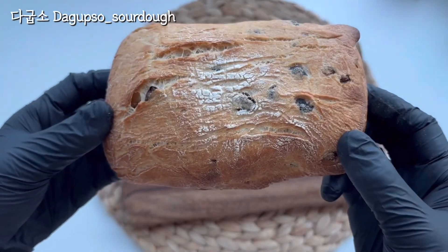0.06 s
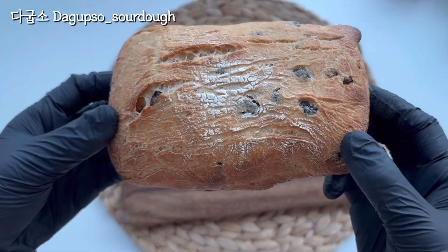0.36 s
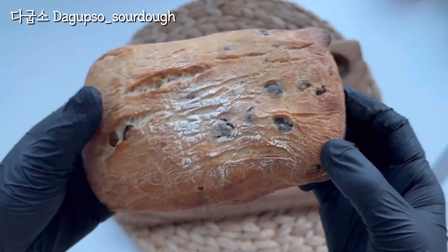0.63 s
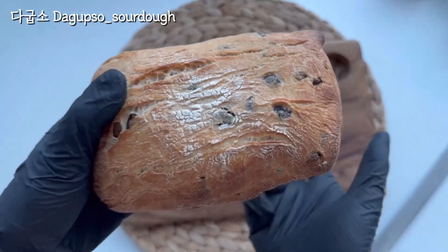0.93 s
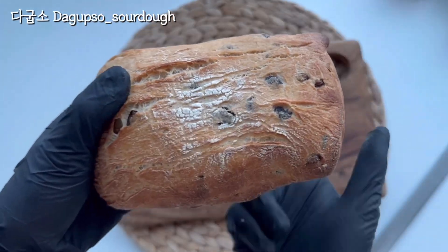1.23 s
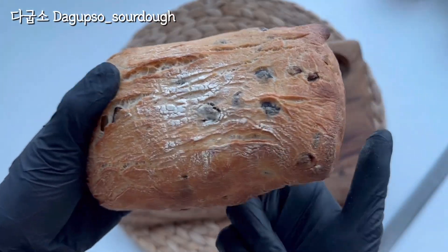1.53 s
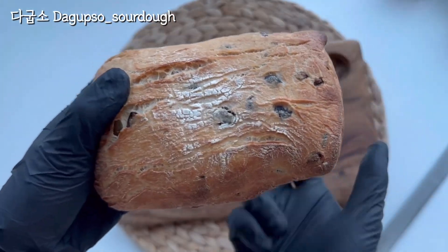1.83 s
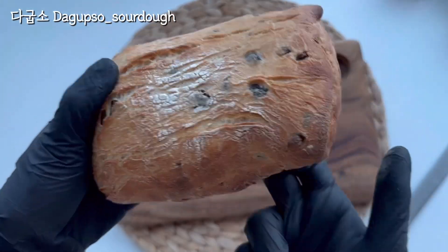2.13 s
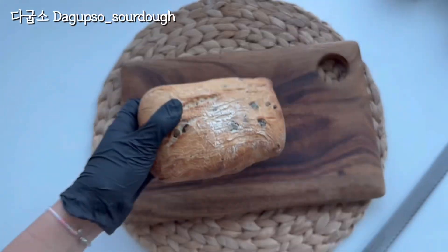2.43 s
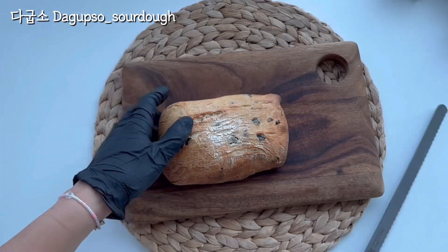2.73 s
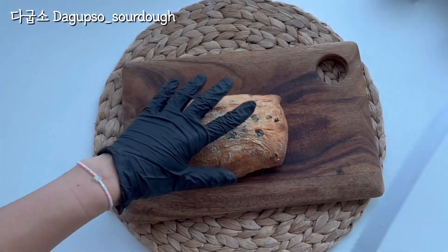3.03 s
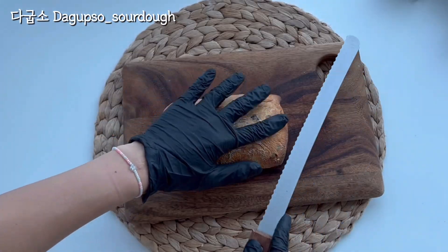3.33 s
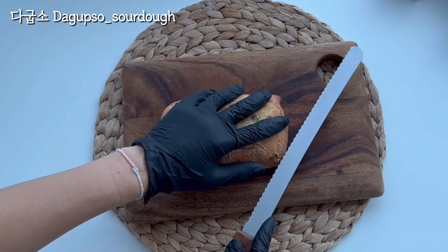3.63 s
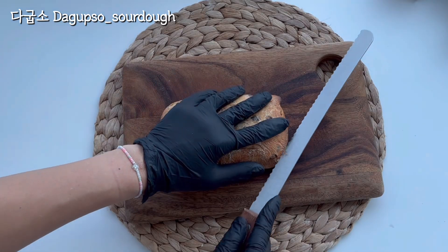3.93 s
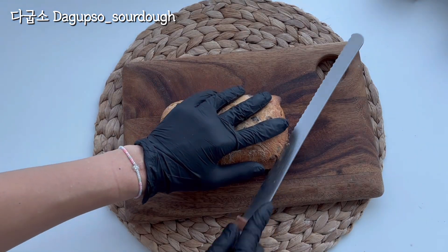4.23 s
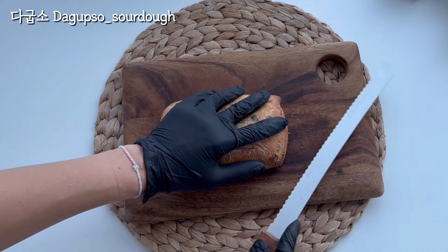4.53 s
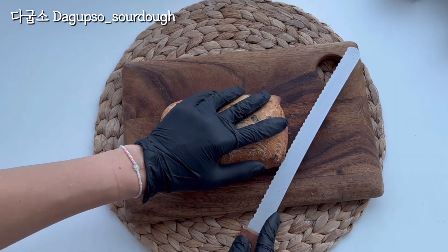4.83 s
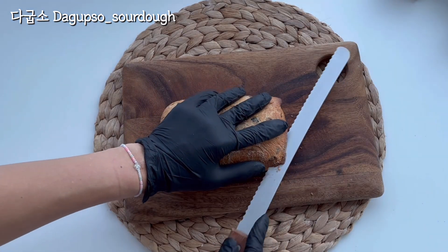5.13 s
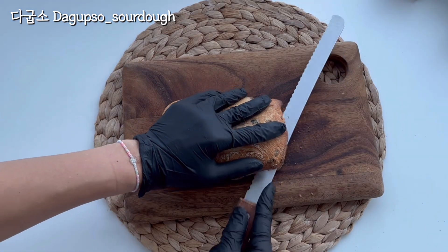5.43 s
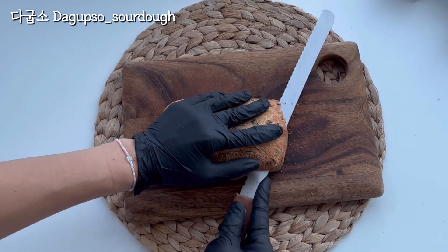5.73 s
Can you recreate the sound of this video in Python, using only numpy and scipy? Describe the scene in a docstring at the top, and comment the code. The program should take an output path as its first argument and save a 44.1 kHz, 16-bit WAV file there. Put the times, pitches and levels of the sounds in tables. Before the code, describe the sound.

At the start, gloved hands turn a crusty loaf with soft, low bumps, a faint rubbery rustle and a tiny creak of crust. From about 1.0 to 2.1 seconds, knuckles knock on it five times, each knock hollow and woody with a dry tick. At 2.5 seconds the loaf thuds onto a wooden board, then rocks and slides with a short rasp until 2.9. Faint glove brushes follow. From about 3.8 to 4.5 seconds a serrated knife saws into the crust in short, crunchy strokes, with flakes snapping sharply. After a brief pause with one small crack, the sawing resumes at 4.9 and continues to about 6 seconds, crackling and rasping while the board and table thump dully underneath. Everything is close and slightly to the left, heard in stereo in a small room with a steady, low ventilation hum.

```python
"""A serrated knife scores and saws a crusty loaf: each catch of the teeth fractures the brittle crust,
flakes crack off, and board and table are forced into vibration. Before the cut, gloved hands turn the
loaf, knock on it five times, set it on a wooden board and slide it into place; the blows excite bending
waves and damped modes, and friction rustles and rasps. A stereo microphone close above hears it all
in a small room with a steady ventilation hum."""
import sys
import numpy as np
from scipy import signal
from scipy.fft import rfft, irfft, next_fast_len
from scipy.io import wavfile
from scipy.ndimage import uniform_filter1d

SR = 44100
rng = np.random.default_rng(int(sys.argv[2]) if len(sys.argv) > 2 else 0)


def generate_wav(sig):
    """Save sig (samples, or channels by samples) to the path in sys.argv[1] as 16-bit PCM at SR."""
    pcm = np.round(np.clip(np.atleast_2d(sig).T, -1, 1) * 32767).astype(np.int16)
    wavfile.write(sys.argv[1], SR, pcm)


N = 263718
TIME = np.arange(N) / SR

# Levels in the tables are relative; each source applies its own gains and filters.
# Strokes of the knife, and pushes of the loaf over the board. Each row: start, fastest moment and end
# in seconds, then levels of crackle, rasp, board and table in dB.
KNIFE_STROKES = [(3.86, 3.95, 3.99, -44.5, -47, -45.5, -41.5), (4.015, 4.07, 4.16, -40, -44, -36, -48),
                 (4.24, 4.3, 4.37, -42.5, -51.5, -44.5, -35), (4.405, 4.41, 4.46, -59, -54, -48.5, -48.5),
                 (4.935, 4.978, 5.07, -41, -45.5, -42, -43.5), (5.11, 5.162, 5.225, -38.5, -43, -44, -44),
                 (5.285, 5.338, 5.43, -37.5, -37, -43, -38), (5.455, 5.53, 5.63, -41.5, -43, -39, -43),
                 (5.665, 5.73, 5.85, -39.5, -39, -39, -34.5),
                 (5.845, 5.895, 5.95, -40, -38.5, -37.5, -31.5)]
LOAF_PUSHES = [(2.63, 2.642, 2.7, -49, -38.5, -54, -66), (2.67, 2.738, 2.848, -33.5, -45.5, -57, -59),
               (2.785, 2.795, 2.84, -63, -36.5, -44, -39.5), (2.84, 2.856, 2.923, -35, -44.5, -45, -40.5)]
# How crackle, rasp, board and table follow a movement. Each row: rise in dB, fall in dB, lag in seconds.
STROKE_ENVELOPES = [(5.3, 25, 0.0014), (5.2, 25.6, 0.0082), (5.9, 11.6, 0.012), (6.6, 16.4, 0.0019)]
PUSH_ENVELOPES = [(13.5, 58, 0.0044), (6, 15.5, 0.014), (5, 10, 0), (-2, 10, 0.0047)]
# The blade dragging in the cut. Each row: start and end in seconds, crackle and rasp levels in dB.
BLADE_DRAGS = [(4.1, 4.398, -56.5, -59), (5.074, 6.1, -55, -55.5)]
# Large flakes breaking. Each row: time in seconds, levels of bright splinter and lower crack in dB.
FLAKE_SNAPS = [(2.631, -31, -34.5), (3.501, -46.5, -53.5), (3.819, -44, -49), (3.9415, -40, -49),
               (4.0094, -28, -38), (4.0323, -23.5, -47), (4.0345, -29, -46), (4.059, -34, -33),
               (4.0843, -39, -33), (4.2464, -36, -58), (4.2687, -24, -50), (4.3154, -26.5, -52),
               (4.397, -42, -62), (4.4075, -39, -45.5), (4.7119, -38, -45.5), (4.8974, -36.5, -47),
               (4.9208, -27.5, -34), (4.9381, -26, -50), (4.9584, -28, -48), (4.979, -26, -42),
               (4.984, -23, -35.5), (5.0886, -44, -53), (5.104, -34, -58), (5.12, -28, -40),
               (5.154, -30, -36), (5.1761, -15.5, -34), (5.1785, -39, -37), (5.266, -29.5, -37),
               (5.2895, -21.5, -39), (5.316, -32, -37), (5.3225, -32, -30), (5.3436, -29, -25),
               (5.42, -37.5, -52), (5.4408, -38, -39), (5.4575, -29, -34.5), (5.528, -27.5, -47),
               (5.544, -38, -32.5), (5.648, -36, -42), (5.6553, -41, -43), (5.6768, -31, -34),
               (5.724, -25, -41), (5.739, -33, -36), (5.894, -39, -36)]
# Snags of the blade. Each row: time in seconds, then the level of each of the three low modes in dB.
BLADE_SNAGS = [(3.873, -49, -34.5, -61), (4.052, -36.5, -40, -28.5), (4.134, -52, -38, -43),
               (4.3, -34.5, -48, -36.5), (4.711, -40.5, -38, -45), (4.99, -50, -36, -47),
               (5.172, -56, -32.5, -46), (5.365, -53, -50, -37.5), (5.7, -22.5, -41, -43),
               (5.901, -27.5, -32, -36)]
# Low modes of table and board. Each row: frequency in Hz, 60 dB decay time in seconds.
LOW_MODES = [(70.5, 0.57), (144, 0.52), (210, 0.41)]
# Knuckle blows. Each row: time in seconds, levels of note, tick and clack in dB, starting pitch in Hz,
# level of the glove's rub in dB, treble gain of the tick in dB.
KNUCKLE_BLOWS = [(1.0357, -18, -23, -19.5, 890, -66, 0), (1.2774, -18, -25.5, -29, 890, -66, 4.5),
                 (1.5004, -17.5, -23.5, -22.5, 914, -64, 0), (1.8862, -17, -22, -16, 883, -63.5, 2),
                 (2.0924, -17.5, -23, -19.5, 895, -61, 5.5)]
# The loaf landing and rocking. Each row: time in seconds, levels of the blow and the loaf's note in dB.
LANDING_BLOWS = [(2.548, -17.5, -20), (2.553, -30.5, -42), (2.786, -30.5, -37), (2.838, -30, -27.5)]
# Soft bumps as fingers grip and the loaf rocks. Each row: start in seconds, level in dB, pitch in Hz.
SOFT_BUMPS = [(.016, -16, 78), (.032, -17, 83.2), (0.064, -21, 88), (0.157, -18.5, 97), (.263, -26, 60.3),
              (1.015, -28.5, 62), (2.58, -27.5, 55), (2.785, -28, 52), (2.869, -25, 48), (4.304, -30, 58.3),
              (4.973, -30, 51.7), (5.148, -28.5, 60.6), (5.368, -25.5, 52.2), (5.59, -23.5, 53.3)]
# Glove touches. Each row: time of most pressure in seconds, level in dB, length in seconds.
GLOVE_BRUSHES = [(0.502, -61, 0.031), (0.543, -60, 0.044), (0.703, -48, 0.17), (0.925, -66.5, 0.6),
                 (2.243, -74, 1), (2.532, -64, 0.018), (2.596, -60, 0.1), (3.06, -58.5, 0.13),
                 (3.173, -65, 0.26), (3.425, -67, 0.28), (3.553, -77, 0.49), (3.72, -65.5, 0.093),
                 (4.737, -66, 0.057), (4.843, -74, 0.15)]
# Creaks of the crust under a finger. Each row: time in seconds, level in dB.
CRUST_CREAKS = [(0.848, -31), (1.806, -37), (1.815, -41), (1.864, -29)]

# Modes of the struck loaf and board. Each row: frequency in Hz, level in dB, 60 dB decay time in seconds.
LOAF_MODES = [(92, -21, 0.35), (141, -17, 0.3), (470, -29, 0.3), (591, -20, 0.13), (693, -26, 0.08),
              (1260, -25, 0.02)]
BOARD_MODES = [(140.3, 5.5, 0.12), (286, -1, 0.083), (347.5, -5, 0.2), (448, 1, 0.15), (603, 1, 0.17),
               (829, 10.5, 0.08), (1050, -1.5, 0.078), (1280, -26, 0.2), (1696, -3, 0.076),
               (1884, -3, 0.08), (2130, -14, 0.08), (2550, -17, 0.052)]
# Resonances of the driven bodies. Each row: centre frequency in Hz, bandwidth in Hz, peak gain in dB.
BOARD_RESONANCES = [(144.3, 15.4, 6.5), (170, 53, -9.5), (211.2, 7.5, 5), (270, 38, -12.5), (352, 32, -10),
                    (457, 17, -10.5)]  # board and loaf pressed on the mat
TABLE_RESONANCES = [(46.3, 16, -6.5), (71.25, 5.7, 17), (99.5, 5.3, -15)]
RASP_RESONANCES = [(600, 30, -3), (828, 30, -4), (1568, 24, -6), (1745, 30, -3), (1925, 34, -4),
                   (2090, 30, -6), (2960, 60, -8), (4190, 70, -8)]
CLACK_RESONANCES = [(850, 450, 2.5), (1550, 550, 4.5), (2550, 600, 6)]
CREAK_RESONANCES = [(3620, 840, 6.5), (6170, 700, -3)]
HELD_LOAF_RESONANCES = [(67.4, 13.5, 12.5), (105.4, 176, -3.5)]
# Spectra of the fractures, contacts and hum. Each row: frequency in Hz, spectral density level in dB.
CUT_RASP_SPECTRUM = [(200, -10), (350, -10), (480, -6.5), (650, -2), (1100, -5.5), (1800, -3.5),
                     (2500, -12), (3300, -8), (4500, -14.5), (7000, -24)]
CUT_CRACKLE_SPECTRUM = [(800, -2.5), (2350, 0), (4100, -2.5), (4710, -4.5), (5730, -4.5), (6630, -0.5),
                        (7930, -5.5), (8650, -0.5), (9600, 3), (12000, -9), (14700, -1.5), (16000, -14)]
FLAKE_SPECTRUM = [(800, -13.5), (3000, -9), (7500, -3), (9600, -1), (12000, 2), (15000, 3), (16000, -7)]
TICK_SPECTRUM = [(400, -12), (900, -3), (1600, 4.5), (2800, -6), (3800, -18), (7000, -14.5), (10000, -10),
                 (15000, -14), (18000, -20)]
THUD_SPECTRUM = [(80, -13), (250, -36), (450, -15), (850, -1.5), (1150, -5), (1800, -13), (2400, -23.5),
                 (4200, -25.5), (7000, -34.5), (16000, -43)]
SLIDE_RASP_SPECTRUM = [(200, -24), (350, -3.5), (600, -7), (950, -1), (1600, -2), (2200, -6.5), (3000, -14),
                       (4500, -20), (7000, -35)]
SLIDE_CRACKLE_SPECTRUM = [(1200, -3), (2500, 5), (3600, 1.5), (4700, 1.5), (6000, -3.5), (7400, -2),
                          (9000, -4.5), (11500, -13), (15000, -11), (16000, -28)]
GLOVE_SPECTRUM = [(1290, -19), (2200, -3), (3330, -0.5), (4310, -5), (5910, -2.5), (8240, -5.5), (9500, -2),
                  (14200, -10), (16000, -9.5)]
HUM_SPECTRUM = [(12, -47.5), (20, 0.5), (81, 8), (193, -6.5), (277, -3), (357, -6), (434, -7), (499, -13),
                (574, -7.5), (780, -8.5), (1030, -6.5), (3740, -39), (8180, -55), (9400, -53), (16000, -64)]

# Reflections from the walls. Each row: delay in seconds, signed gain.
WALL_ECHOES = [(0.0165, -0.17), (0.0229, 0.12), (0.0311, -0.18), (0.0394, -0.135), (0.0424, 0.25),
               (0.0505, -0.2), (0.0733, -0.125), (0.0765, 0.125), (0.0964, 0.08), (0.119, 0.115)]
# Reverberation of the room. Each row: frequency in Hz, 60 dB decay time in seconds, level in dB.
ROOM_DECAY = [(110, 0.77, 0.5), (230, 0.48, -4), (450, 0.37, -0.5), (1500, 0.34, 5), (14400, 0.33, -2.5)]
# Likeness of scattered sound at the two microphones. Each row: frequency in Hz, correlation from -1 to 1.
DIFFUSE_COHERENCE = [(60, 1), (130, 0.89), (290, 0.67), (640, -0.12), (3000, 0.28), (8000, -0.41),
                     (13000, 0.93)]
# Stereo balance of the handling. Each row: frequency in Hz, left minus right level in dB.
LEVEL_DIFFERENCE = [(85, 2), (350, 4), (700, 5.5), (1400, 1.5), (2800, 0.5), (5600, 3.5), (10000, 1),
                    (14000, -0.5)]

ONSET_S = 0.035  # time for a movement to take hold


def sawing():
    """Stick-slip friction: the teeth catch in the crust and drag on even as the blade turns round."""
    crackle, rasp, board, table = movement(KNIFE_STROKES, STROKE_ENVELOPES)
    drag = 0
    for start, end, crackle_db, rasp_db in BLADE_DRAGS:
        contact = np.clip(np.minimum(TIME - start, end - TIME) / ONSET_S, 0, 1)
        drag = drag + from_db([[crackle_db], [rasp_db]]) * contact
    crackle, rasp = np.hypot([crackle, rasp], drag)
    catches = catch_train(per_s=145, jitter=0.35, uneven_db=3.4)
    return scrape([crackle, rasp, board, table], CUT_RASP_SPECTRUM, CUT_CRACKLE_SPECTRUM, catches,
                  grains_per_s=3000, burst_s=0.01, steady=0.55, scatter_db=5.5)


def scrape(gains, rasp_spectrum, crackle_spectrum, catches, grains_per_s, burst_s, steady, scatter_db):
    """Forced vibration: each catch frees a burst of fractures and jolts the board and the table."""
    crackle_gain, rasp_gain, board_gain, table_gain = gains
    bursts = rms_one(signal.lfilter([1], [1, -np.exp(-1 / (burst_s * SR))], catches + 1e-18))
    fractures = grains(grains_per_s, spread_db=4) * (steady + bursts)
    cracks = even(wandering(fractures, scatter_db))
    crackle = crackle_gain * colour(cracks, crackle_spectrum)
    rough = colour(cracks, rasp_spectrum)
    rasp = rasp_gain * even(rough + resonate(rough, RASP_RESONANCES))
    jolts = rms_one(catches) + cracks[0]
    board = board_gain * even(resonate(jolts, BOARD_RESONANCES))
    table = table_gain * even(resonate(jolts, TABLE_RESONANCES), size=1800)
    return crackle + rasp + board + table


def movement(moves, envelopes, rise_curve=1.02, fall_curve=1.56):
    """Friction noise grows with speed: gains of crackle, rasp, board and table, moves adding in power."""
    gains = []
    for layer, (rise_db, fall_db, lag_s) in enumerate(envelopes):
        t, power = TIME[::32] - lag_s, 0
        for start, fastest, end, *levels in moves:
            before = np.maximum(fastest - t, 0) / max(fastest - start, ONSET_S)
            after = np.maximum(t - fastest, 0) / max(end - fastest, ONSET_S)
            hold = np.clip((t - start) / ONSET_S + 1, 0, 1)
            db = levels[layer] - rise_db * before ** rise_curve - fall_db * after ** fall_curve
            power = power + (hold * from_db(db)) ** 2
        gains.append(np.interp(TIME, t + lag_s, np.sqrt(power)))
    return gains


def chips():
    """Brittle fracture: small flakes chip and thicker bits crunch, louder as the knife bites harder."""
    bite, press, *_ = movement(KNIFE_STROKES, STROKE_ENVELOPES)
    flakes = bite * rms_one(catch_train(per_s=42, jitter=0.54, uneven_db=5.8))
    flakes = wandering(flakes, scatter_db=2, t60_s=0.014)
    bits = press * rms_one(catch_train(per_s=45, jitter=0.55, uneven_db=8))
    bits = wandering(bits, scatter_db=0, t60_s=0.014)
    return from_db(-8) * colour(flakes, FLAKE_SPECTRUM) + from_db(-5) * colour(bits, CUT_RASP_SPECTRUM)


def crumb_muffling(x, first_cut_s=3.35, open_db=3, loss_db_per_s=3):
    """Absorption: as the blade sinks, the crumb around it takes more treble from the crunch."""
    treble_db = open_db - loss_db_per_s * np.maximum(TIME - first_cut_s, 0)
    return shelf(x, treble_db, above_hz=7960)


def snaps():
    """Brittle fracture: a large flake gives a bright splinter and a lower crack, scattered separately."""
    times, splinter_db, crack_db = np.transpose(FLAKE_SNAPS)
    splinter = wandering(clicks(times, splinter_db + 14), scatter_db=12, t60_s=0.022)
    crack = wandering(clicks(times, crack_db + 23), scatter_db=9, t60_s=0.063)
    return colour(splinter, CUT_CRACKLE_SPECTRUM) + colour(crack, CUT_RASP_SPECTRUM)


def snags(swell_s=0.0078):
    """Free vibration: the snagging blade shoves the loaf, and table and board ring in their low modes."""
    times, *levels = np.transpose(BLADE_SNAGS)
    t, out = TIME[:SR], 0
    for db, (hz, t60) in zip(levels, LOW_MODES):
        envelope = (1 - np.exp(-t / swell_s)) * from_db(-60 * t / t60)
        out = out + convolve(clicks(times, db), envelope * np.sin(2 * np.pi * hz * t))
    return out


def knocks(rub_peak_s=0.04):
    """Impact excitation: the crust ticks and clacks, the loaf rings, and the glove rubs as it lifts."""
    times, note_db, tick_db, clack_db, _, rub_db, treble_db = np.transpose(KNUCKLE_BLOWS)
    note = woody = 0
    for at, db, _, _, hz, *_ in KNUCKLE_BLOWS:
        wave = bending_wave(start_hz=hz, spread_s=0.002053, rise_s=0.0018, length_s=0.0198)
        note = note + convolve(clicks([at], db), wave)
    for hz, mode_db, t60 in LOAF_MODES:
        uneven_db = 2 * rng.standard_normal(len(times))
        woody = woody + ring(clicks(times, note_db + mode_db + uneven_db), hz, t60)
    tick = wandering(clicks(times, tick_db + 2), scatter_db=6, t60_s=0.05)
    tick = shelf(colour(tick, TICK_SPECTRUM), np.interp(TIME, times, treble_db), above_hz=9000)
    clack = resonate(clicks(times, clack_db), CLACK_RESONANCES)
    lift = TIME[:SR // 3] / rub_peak_s
    rub_gain = convolve(clicks(times, rub_db), (lift * np.exp(1 - lift)) ** 2)
    rub = rub_gain * colour(rms_one(diffuse(N)), GLOVE_SPECTRUM)
    return note + woody + tick + clack + rub


def bending_wave(start_hz, spread_s, rise_s, length_s):
    """Dispersion: bending waves in the crust carry the highs fastest, so pitch falls as 1 / time."""
    t = TIME[:SR // 20]
    phase = 2 * np.pi * start_hz * spread_s * np.log1p(t / spread_s)
    envelope = (1 - np.exp(-(t / rise_s) ** 2)) * np.exp(-(t / length_s) ** 10)
    return -np.sin(phase) * envelope


def landing():
    """A collision excites both bodies: a thud, the loaf's falling note and the modes of the board."""
    times, blow_db, loaf_db = np.transpose(LANDING_BLOWS)
    hits = clicks(times, blow_db)
    board = sum((-1) ** k * from_db(db - 15) * ring(hits, hz, t60)
                for k, (hz, db, t60) in enumerate(BOARD_MODES))
    wave = bending_wave(start_hz=1017, spread_s=0.00263, rise_s=0.0017, length_s=0.014)
    loaf = convolve(clicks(times, loaf_db), wave)
    thud = from_db(12) * colour(scatter(hits, scatter_db=10, t60_s=0.057), THUD_SPECTRUM)
    return thud + board + loaf


def sliding():
    """Stick-slip friction: the crust catches on the board as the loaf is pushed into place."""
    gains = movement(LOAF_PUSHES, PUSH_ENVELOPES)
    catches = catch_train(per_s=260, jitter=0.5, uneven_db=4.2)
    return scrape(gains, SLIDE_RASP_SPECTRUM, SLIDE_CRACKLE_SPECTRUM, catches,
                  grains_per_s=7000, burst_s=0.011, steady=0.67, scatter_db=6.5)


def bumps(swell_s=0.0061):
    """Heavily damped oscillation: soft fingertips rock the loaf for a cycle or two."""
    out = np.zeros(N)
    for start, db, hz in SOFT_BUMPS:
        t = np.maximum(TIME - start, 0)
        envelope = (t / swell_s) ** 2 * np.exp(2 - 2 * t / swell_s)
        out -= from_db(db - 1) * envelope * np.sin(2 * np.pi * hz * t)
    return out


def grip(start_db=-36, settle_db_per_s=32):
    """Random excitation: shifting fingers drive the loaf's dull resonances until the grip settles."""
    rumble = resonate(resonate(rng.standard_normal(N), HELD_LOAF_RESONANCES), HELD_LOAF_RESONANCES)
    return from_db(start_db - settle_db_per_s * TIME) * even(rumble)


def gloves(rise_share=0.51, swing_db=19):
    """Sliding friction: rubber on the floury crust rustles, swelling and fading with each touch."""
    touch = 0
    for peak_s, db, length_s in GLOVE_BRUSHES:
        away = np.maximum((peak_s - TIME) / rise_share, (TIME - peak_s) / (1 - rise_share)) / length_s
        touch = touch + from_db(db - swing_db * np.minimum(away, 10))
    rustle = even(wandering(grains(per_s=6000, spread_db=3.5), scatter_db=0), size=3000)
    return touch * colour(rustle, GLOVE_SPECTRUM)


def creaks():
    """Acoustic emission: the crust gives tiny ticks under the pressure of the fingers."""
    times, db = np.transpose(CRUST_CREAKS)
    return resonate(scatter(clicks(times, db), scatter_db=5, t60_s=0.018), CREAK_RESONANCES)


def room(x, wet_db=-12, build_s=0.0034, echo_cut_hz=330):
    """Reverberation: a few dull wall echoes and a diffuse tail that dies sooner in the treble."""
    size = SR * 2 // 3
    t, noise = TIME[:size], rfft(diffuse(size))
    hz = np.arange(noise.shape[1]) * SR / size
    centres_hz = np.array(ROOM_DECAY)[:, 0]
    tail = 0
    for share, (_, t60, db) in zip(np.eye(len(ROOM_DECAY)), ROOM_DECAY):
        band = at_hz(list(zip(centres_hz, share)), hz)
        tail = tail + irfft(noise * band, size) * from_db(db - 60 * t / t60)
    tail = tail * (1 - np.exp(-t / build_s))
    walls = np.zeros(size)
    for delay_s, gain in WALL_ECHOES:
        walls[round(delay_s * SR)] = gain
    walls = rolloff(walls, "low", echo_cut_hz, order=2)
    return x + convolve(x, from_db(wet_db) * tail / np.linalg.norm(tail[0]) + walls)


def ventilation(level_db=-46.5):
    """Stationary noise: the ventilation fills the room with a diffuse, steady hum."""
    noise = diffuse(next_fast_len(N))[:, :N]
    return from_db(level_db) * rms_one(colour(noise, HUM_SPECTRUM, size=8192))


def microphones(x, right_lag_s=13.7e-6):
    """Level and time differences: the sound reaches the left microphone a little louder and sooner."""
    hz = np.arange(N // 2 + 1) * SR / N
    delay = np.exp(-2j * np.pi * hz * right_lag_s)
    lean = from_db(at_hz(LEVEL_DIFFERENCE, hz) / 2)
    return irfft(rfft(x) * np.array([lean, delay / lean]), N)


def scatter(x, scatter_db, t60_s, size=2048):
    """Scattering: a crack arrives directly, then by way of loaf, hands and board."""
    spray = diffuse(size) * from_db(-60 * TIME[:size] / t60_s)
    response = from_db(scatter_db) * spray / np.linalg.norm(spray[0])
    response[:, 0] += 1
    return convolve(x, response / np.linalg.norm(response[0]))


def wandering(x, scatter_db, t60_s=0.033, size=2048):
    """Time-varying scattering: each place the contact reaches on the crust has its own response."""
    out, window = np.zeros((2, N)), np.sqrt(np.hanning(2 * size))
    decay = from_db(-60 * TIME[:size] / t60_s)
    for i in range(0, N - size, size):
        spray = diffuse(size) * decay
        here = x[i:i + 2 * size] * window[:N - i]
        heard = convolve(here, spray / np.linalg.norm(spray[0]))[:, :N - i]
        out[:, i:i + heard.shape[1]] += heard
    return (x + from_db(scatter_db) * out) / np.hypot(1, from_db(scatter_db))


def diffuse(size):
    """A diffuse field: stereo noise whose coherence is full in the bass and varies above it."""
    mid, side = rfft(rng.standard_normal((2, size)))
    alike = np.clip(at_hz(DIFFUSE_COHERENCE, np.arange(len(mid)) * SR / size), -1, 1)
    return irfft(np.sqrt(1 + alike) * mid + np.sqrt(1 - alike) * side * [[1], [-1]], size) / np.sqrt(2)


def grains(per_s, spread_db):
    """A Poisson process of micro-fractures, many small and a few large."""
    sizes = from_db(spread_db * np.minimum(rng.exponential(1, N), 4))
    return rms_one(sizes * rng.choice([-1, 1], N) * (rng.random(N) < per_s / SR))


def catch_train(per_s, jitter, uneven_db, count=2000):
    """A renewal process: catches of differing force at log-normal intervals."""
    times = np.cumsum(np.exp(jitter * rng.standard_normal(count)) / per_s)
    force_db = uneven_db * rng.uniform(-0.12, 1, count)
    inside = times < TIME[-1]
    return clicks(times[inside], force_db[inside])


def clicks(times, db):
    """One ideal impulse for each event."""
    out = np.zeros(N)
    out[np.clip(np.round(np.asarray(times) * SR).astype(int), 0, N - 1)] = from_db(db)
    return out


def ring(hits, hz, t60):
    """A damped mode: each hit starts an exponentially decaying sine."""
    t = TIME[:SR // 3]
    return convolve(hits, from_db(-60 * t / t60) * np.sin(2 * np.pi * hz * t))


def resonate(x, resonances):
    """Superposition of two-pole resonators driven in parallel."""
    out = 0
    for hz, width_hz, db in resonances:
        r = np.exp(-np.pi * width_hz / SR)
        feedback = [1, -2 * r * np.cos(2 * np.pi * hz / SR), r * r]
        out = out + from_db(db) * (1 - r * r) / 2 * signal.lfilter([1, 0, -1], feedback, x + 1e-18)
    return out


def colour(x, spectrum, size=4096):
    """A causal, minimum-phase filter of unit power with the given spectrum."""
    magnitude = from_db(at_hz(spectrum, np.arange(size // 2 + 1) * SR / size))
    cepstrum = irfft(np.log(magnitude))
    cepstrum[1:size // 2] *= 2
    cepstrum[size // 2 + 1:] = 0
    response = irfft(np.exp(rfft(cepstrum)))
    return convolve(x, response / np.linalg.norm(response))


def shelf(x, db, above_hz):
    """A shelving filter raises or lowers the treble."""
    return x + rolloff(x, "high", above_hz, order=1) * (from_db(db) - 1)


def rolloff(x, kind, hz, order):
    """A maximally flat low-pass or high-pass filter."""
    return signal.sosfilt(signal.butter(order, hz, kind, fs=SR, output="sos"), x)


def convolve(x, response):
    """Convolution with an impulse response, mono or stereo."""
    return signal.oaconvolve(np.atleast_2d(x), np.atleast_2d(response), axes=1)[:, :N]


def even(x, size=1500):
    """Division by the running rms steadies the level and leaves the grain."""
    power = np.mean(np.atleast_2d(x) ** 2, axis=0)
    return x / np.sqrt(uniform_filter1d(power, size) + 1e-12)


def at_hz(points, hz):
    """Interpolation on a log-frequency axis."""
    known_hz, values = np.transpose(points)
    return np.interp(np.log(np.maximum(hz, 1)), np.log(known_hz), values)


def rms_one(x):
    """Normalisation to rms 1."""
    return x / np.sqrt(np.mean(x ** 2) + 1e-20)


def from_db(db):
    """Decibels to amplitude ratio."""
    return 10 ** (np.asarray(db) / 20)


def scene():
    """Superposition: cutting and handling sound a little to the left, over the room's hum."""
    slide, saw = sliding(), sawing()
    handling = grip() + knocks() + bumps() + gloves() + creaks() + landing() + slide
    cutting = crumb_muffling(saw + chips()) + snaps()
    hum = ventilation()
    return microphones(room(cutting + handling) + snags()) + hum


def record(dry, low_cut_hz=28, left_cut_hz=24, top_hz=16000):
    """Band limiting: the deepest rumble is rolled off, more on the left, and the top is cut steeply."""
    left, right = rolloff(dry, "high", low_cut_hz, order=2)
    left = rolloff(left, "high", left_cut_hz, order=1)
    return signal.sosfilt(signal.ellip(10, 0.2, 80, top_hz, fs=SR, output="sos"), [left, right])


dry = scene()
out = record(dry)
generate_wav(out)
```